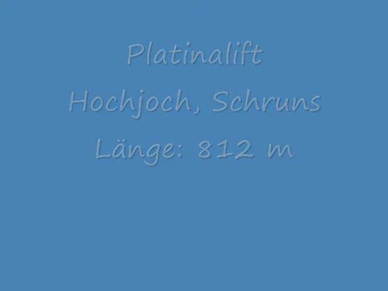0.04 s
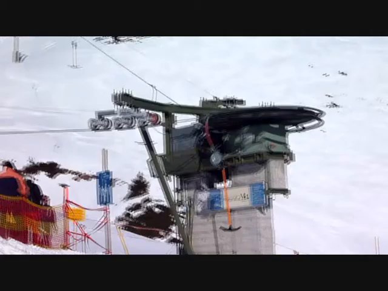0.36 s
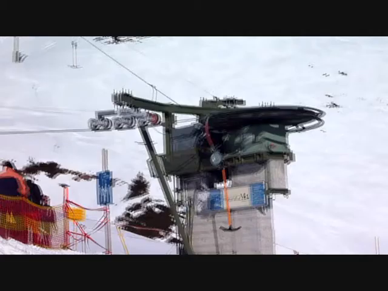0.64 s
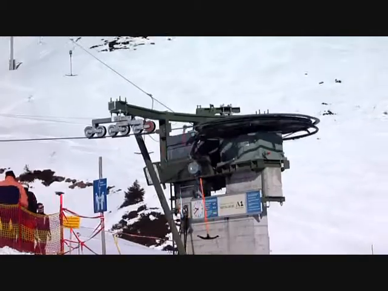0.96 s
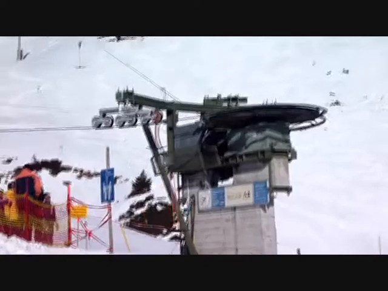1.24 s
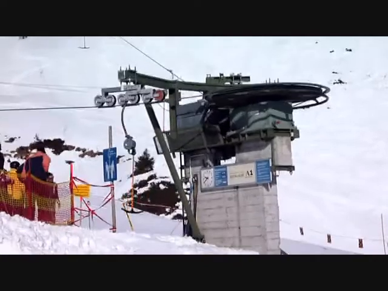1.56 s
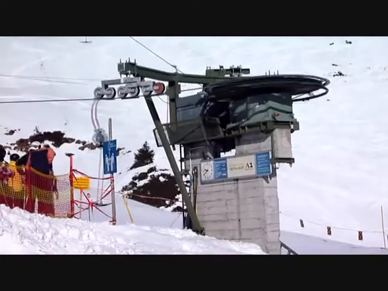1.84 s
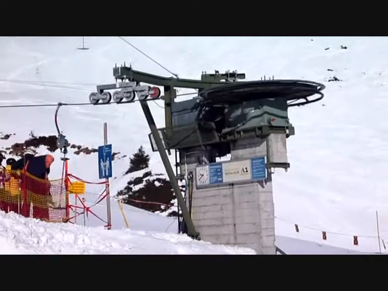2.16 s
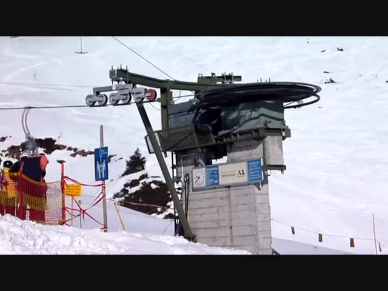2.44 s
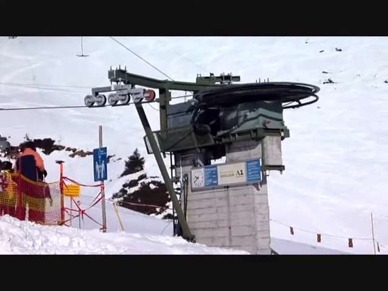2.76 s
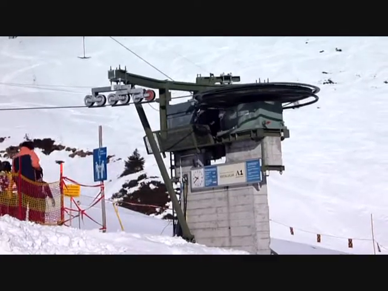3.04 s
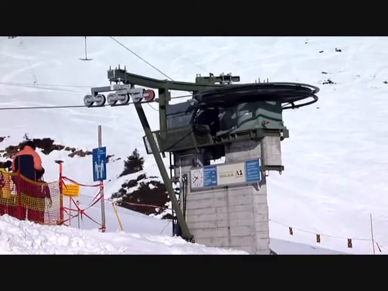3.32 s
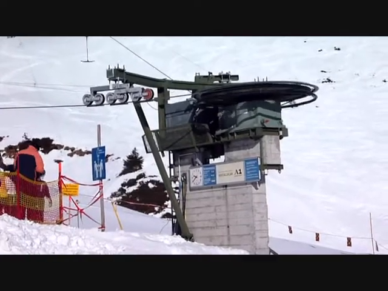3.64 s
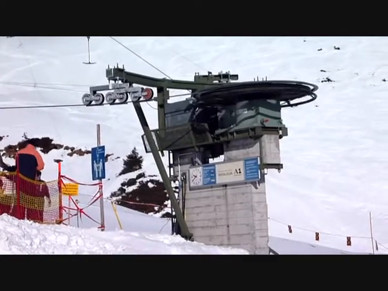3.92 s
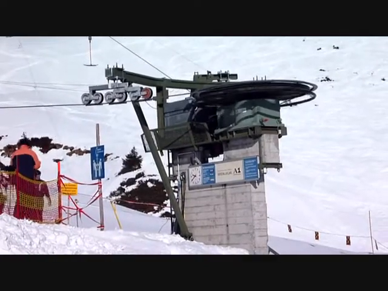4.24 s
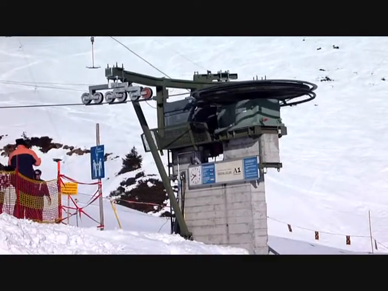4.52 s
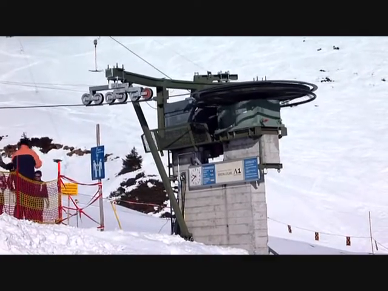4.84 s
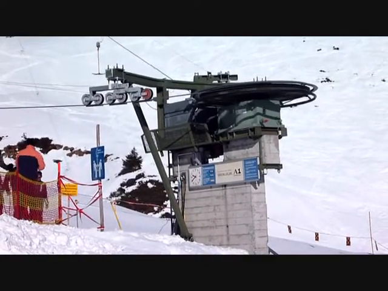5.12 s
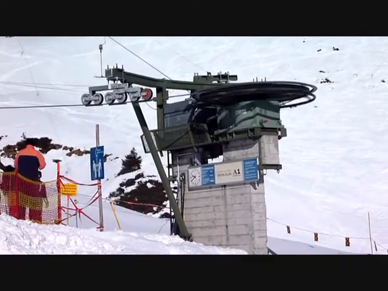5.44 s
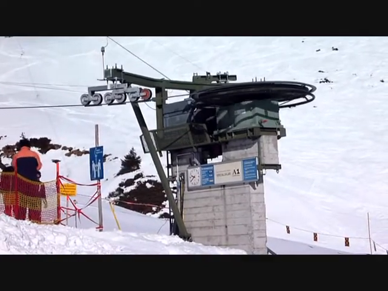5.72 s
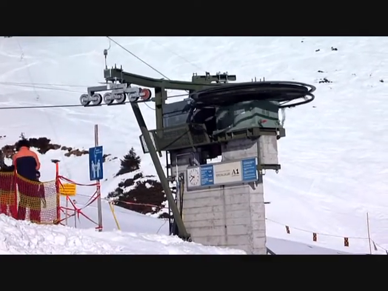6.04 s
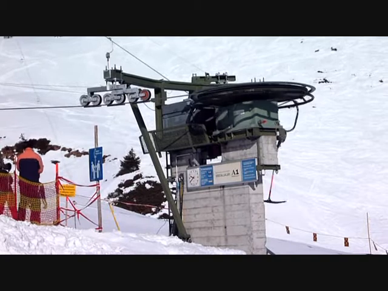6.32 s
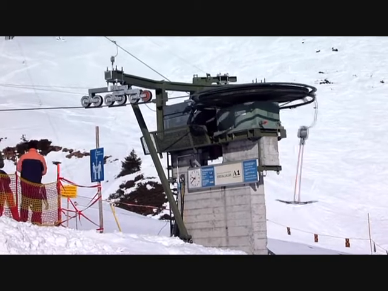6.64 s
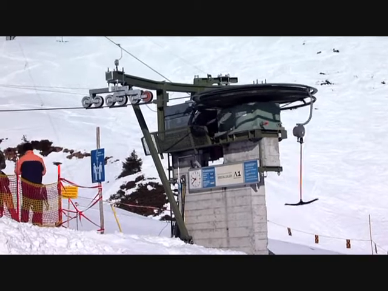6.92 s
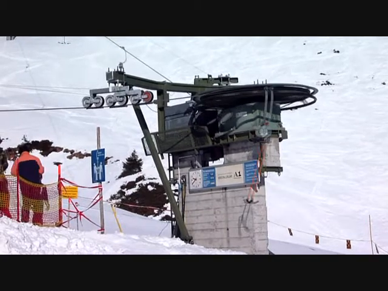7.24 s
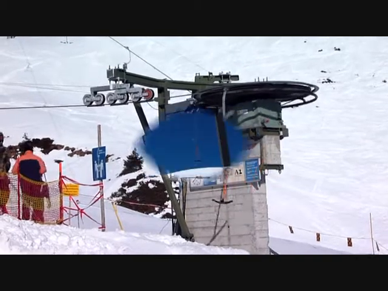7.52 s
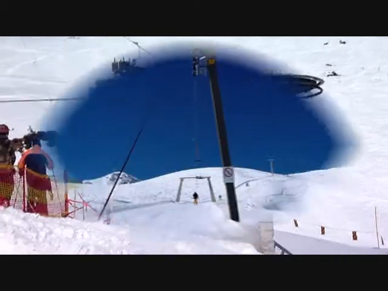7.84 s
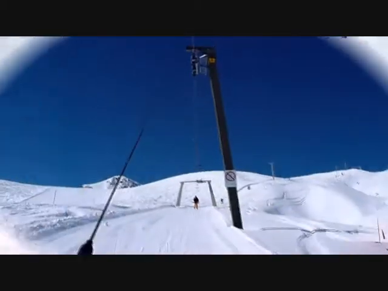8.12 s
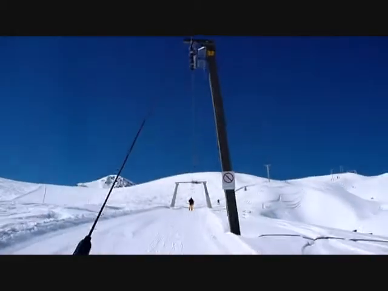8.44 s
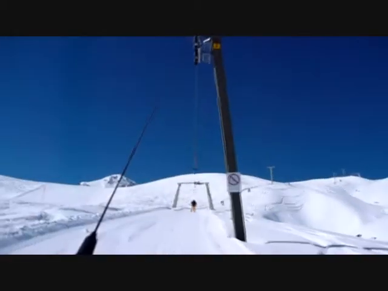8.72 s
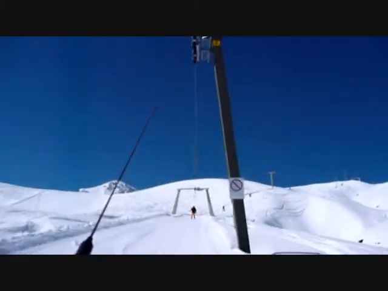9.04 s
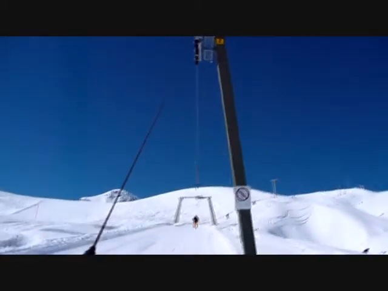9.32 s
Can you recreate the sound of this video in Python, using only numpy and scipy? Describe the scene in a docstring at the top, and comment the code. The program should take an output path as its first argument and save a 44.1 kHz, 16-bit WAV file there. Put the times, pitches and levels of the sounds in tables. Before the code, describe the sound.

A ski lift drive hums and throbs with scraping rope and clanking hangers, then fades into skis sliding on snow and wind.

```python
"""A gearbox hums and throbs after a moment of silence: the drive station of a drag lift on a snowy slope.
Friction of the rope on wheel and rollers excites the steel frame. A sharp snap close by makes the gain
control duck; tow hangers clank through, and the wheel sings as one comes round. The station then fades
into the ride uphill: skis sliding on snow, and wind buffeting the small mono microphone."""
import sys
import numpy as np
from scipy import signal
from scipy.fft import rfft, irfft
from scipy.io import wavfile

SR = 44100
rng = np.random.default_rng(int(sys.argv[2]) if len(sys.argv) > 2 else 0)


def store_pcm(level_fs):
    """Save levels as 16-bit WAV."""
    pcm = np.round(np.clip(level_fs, -1, 1) * 32767).astype(np.int16)
    wavfile.write(sys.argv[1], SR, np.atleast_2d(pcm).T)


N = 413216
TIME, BINS = np.arange(N) / SR, np.fft.rfftfreq(N, 1 / SR)
RIDE_START_S, RIDE_FADE_S = 7.47, 1.42
MIC_EDGE_HZ = 7780


def amp(db):
    """Amplitude ratio of a level in decibels."""
    return 10 ** (np.asarray(db) / 20)


def unit_rms(x):
    """Normalisation to rms 1."""
    return x / np.sqrt(np.mean(x ** 2) + 1e-20)


def envelope(rows, column=1):
    """Gain over time, interpolated in decibels."""
    rows = np.array(rows)
    return amp(np.interp(TIME, rows[:, 0], rows[:, column]))


def swell(s, half_s):
    """Hyperbolic-secant envelope: rises to 1 at time s and dies away."""
    away = np.exp(-abs(TIME - s) / half_s)
    return 2 * away / (1 + away ** 2)


def decay(t, t60):
    """Exponential damping: 60 dB in t60 seconds."""
    return np.exp(-np.log(1000) * t / t60)


def spectrum(points):
    """Gain over frequency, interpolated in decibels on a logarithmic axis."""
    hz, db = np.transpose(points)
    return amp(np.interp(np.log(BINS + 1), np.log(hz + 1), db))


def lowpass(hz, order=6):
    """Butterworth magnitude response."""
    return 1 / np.sqrt(1 + (BINS / hz) ** (2 * order))


def highpass(hz, order=6):
    """Power complement of the low-pass."""
    return np.sqrt(1 - lowpass(hz, order) ** 2)


def resonance(centre_hz, width_hz, hz=BINS):
    """Lorentzian peak of height 1."""
    return 1 / (1 + (2 * (hz - centre_hz) / width_hz) ** 2)


def coloured(x, gain):
    """Filtering by a gain over frequency, to rms 1."""
    return unit_rms(irfft(rfft(x) * gain, len(x)))


def noise(gain, length=N):
    """Filtered Gaussian noise of rms 1."""
    return coloured(rng.standard_normal(length), gain)


def drift(rate_hz):
    """Slow random fluctuation of rms 1, up to about this rate."""
    return noise(lowpass(rate_hz, order=2))


def grit(per_s, spread_db):
    """Shot noise: tiny impacts at random moments, a few of them large."""
    size = amp(spread_db * np.minimum(rng.exponential(1, N), 4))
    return unit_rms(size * rng.choice([-1, 1], N) * (rng.random(N) < per_s / SR))


def tone(cycles, db, waver):
    """Random modulation: a sinusoid wavers in amplitude and phase as the load shifts."""
    angle = 2 * np.pi * (cycles + rng.random())
    knots = np.linspace(0, TIME[-1], 130)
    in_phase, quadrature = (np.interp(TIME, knots, row) for row in rng.standard_normal((2, len(knots))))
    wave = (1 + waver * in_phase) * np.sin(angle) + waver * quadrature * np.cos(angle)
    return amp(db) * unit_rms(wave)


def struck_mode(t, hz, t60):
    """Free vibration of one damped mode, starting at rms 1."""
    return np.sqrt(2) * np.sin(2 * np.pi * (hz * t + rng.random())) * decay(t, t60)


def add(mix, s, sound):
    """Superposition of a sound on the mix at time s."""
    part = mix[round(s * SR):][:len(sound)]
    part += sound[:len(part)]


# harmonics of the motor shaft: (order [1], relative level [dB])
MOTOR_HARMONICS = [(16, -58.5), (18, -51.5), (19, -56), (20, -54), (22, -49.5), (24, -51.5), (26, -48.5),
                   (28, -56.5), (36, -61), (38, -63), (40, -54.7), (42, -66)]
# harmonics of the gear: (order [1], relative level [dB])
GEAR_HARMONICS = [(2, -72), (4, -56), (5, -57.5), (6, -51), (10, -58), (12, -58), (16, -60.5)]
# thin whines of the turning parts: (frequency [Hz], relative level [dB])
WHINE_TONES = [(2740, -61.5), (3052, -61.5), (4581, -66)]
# response of the housing: (frequency [Hz], relative level [dB])
HOUSING_SPECTRUM = [(29, -75), (50, -43), (112, -23), (208, -20.5), (252, -21.5), (276, -18), (326, -14.5),
                    (433, -9), (503, -9), (559, -6), (612, -9), (754, -13.5), (863, -13.5), (1260, -18),
                    (1800, -18.5), (2340, -53.5), (3960, -120)]
# load on the gears, heard in the main mesh tone: (time [s], level [dB])
MESH_LEVEL = [(1.0, -39.5), (1.7, -41), (2.3, -39.5), (2.8, -40.5), (3.4, -39), (4.1, -38.5), (4.85, -44.5),
              (5.7, -40), (6.3, -42.5), (7.0, -38), (7.5, -38.5), (8.45, -40.5)]
# how near the drive sounds: (time [s], gain [dB])
DRIVE_NEARNESS = [(1.2, 0), (2.6, -0.5), (3.9, 1.5), (4.5, -1), (5.05, -2), (5.7, -0.5), (6.3, 0),
                  (6.9, 0.5), (7.6, 0.2)]


def gearbox(motor_hz=24.765, gear_hz=71.19, mesh_order=8, throb_hz=3.175, crest_s=1.463):
    """Periodic forcing: tones share one speed, the mesh tone throbs, tooth noise fills the housing."""
    clock = np.cumsum(1 + 0.00066 * drift(1.3)) / SR  # the speed wanders slightly
    partials = [(k * motor_hz, db) for k, db in MOTOR_HARMONICS]
    partials += [(k * gear_hz, db) for k, db in GEAR_HARMONICS]
    hum = sum(tone(hz * clock, db, waver=0.25) for hz, db in partials)
    whine = sum(tone(hz * clock, db, waver=0.25) for hz, db in WHINE_TONES)
    roar = noise(spectrum(HOUSING_SPECTRUM) * lowpass(999)) * amp(-40.5 + 1.1 * drift(9.9))
    throb = 1 + 0.25 * np.cos(2 * np.pi * throb_hz * (TIME - crest_s))
    mesh = tone(mesh_order * gear_hz * clock, db=0, waver=.12) * throb * envelope(MESH_LEVEL)
    return (hum + whine + roar) * envelope(DRIVE_NEARNESS) + mesh


# resonances of the steel frame and its hangers: (frequency [Hz], bandwidth [Hz], relative level [dB])
FRAME_MODES = [(840, 140, 0), (1370, 80, -6), (1544, 100, -1), (1964, 160, -2.5), (2397, 110, 1.5),
               (2510, 90, 0.5), (2680, 93, -4.5), (3143, 110, 1.5), (3390, 110, 0), (3790, 120, -0.5),
               (4330, 130, -8), (4630, 150, -5)]


def frame_response():
    """Modal summation: the resonances of the steel add in power to a gain over frequency."""
    return np.sqrt(sum(amp(db) ** 2 * resonance(hz, width) for hz, width, db in FRAME_MODES))


# broad colour of the rubbed steel: (frequency [Hz], relative level [dB])
STEEL_SPECTRUM = [(410, -27.5), (700, -12), (751, -6.5), (830, 2.5), (1010, 3), (1270, -3), (1530, -4.5),
                  (1730, -5), (2480, -6), (2880, -6.5), (3250, -7.5), (4130, -13.5), (5810, -17),
                  (6690, -21.5), (7700, -30), (10000, -50), (16900, -120)]
# load of the rope on wheel and rollers: (time [s], relative scrape level [dB], relative hiss level [dB])
ROPE_LOAD = [(1.6, -39.5, -52.5), (2.0, -40, -54), (2.26, -39.5, -45), (2.47, -40, -50.5),
             (2.68, -42, -48.5), (2.91, -40, -46.5), (3.33, -36, -43.5), (3.92, -36, -48.5),
             (4.41, -40, -52), (4.98, -41, -53), (6.75, -39, -47.5), (7.12, -40, -51), (7.4, -39.5, -49.5)]
# a hanger slides along its guide: (time [s], relative level [dB], half length [s])
GUIDE_SWISHES = [(1.03, -52, 0.21), (2.146, -44, 0.064), (4.173, -51, 0.059), (4.686, -48.5, 0.019),
                 (5.042, -50, 0.069), (5.511, -48.5, 0.12)]


def rope(knock_t60=.09, ripple_db=1.1):
    """Friction noise: rope and liners rub in a dense grit that rings the frame, under a finer hiss."""
    rub = rng.standard_normal(N) + 0.42 * grit(1200, spread_db=4.0)
    load = envelope(ROPE_LOAD)
    # small knocks, each a dying rattle, stand out more the harder the rope rubs
    impacts = abs(grit(30, spread_db=1.2))
    knocks = unit_rms(signal.lfilter([1], [1, -decay(1 / SR, knock_t60)], impacts))
    rattle = 0.5 * np.tanh(unit_rms(load)) * knocks * rng.standard_normal(N)
    # countless weak modes of the structure ripple the colour
    mode_hz = np.arange(0, 9000, 22)
    ripple = amp(ripple_db * np.interp(BINS, mode_hz, rng.standard_normal(len(mode_hz))))
    steel = spectrum(STEEL_SPECTRUM) * ripple * (1 + 0.79 * frame_response())
    scrape = coloured(rub + rattle, steel * highpass(1026) * lowpass(5050)) * amp(-1 + 0.29 * drift(12))
    hiss = coloured(rub, steel * highpass(4830)) * amp(0.26 + 0.93 * drift(15))
    swish = sum(amp(db) * swell(s, half_s) for s, db, half_s in GUIDE_SWISHES)
    return scrape * np.hypot(load, swish) + hiss * np.hypot(envelope(ROPE_LOAD, column=2), swish)


# tones of the snap: its ringing, and a low overload tone that colours it:
# (frequency [Hz], relative level [dB], t60 [s])
SNAP_TONES = [(1350, -16.5, .007), (1895, -7, 0.0077), (2580, -13.5, 0.016), (4240, -1.5, 0.0096),
              (4990, -1.5, 0.0092), (5803, 6.5, 0.0068), (7700, -14, 0.013)]


def snap(s=1.2083, gain_db=2.3, rise_s=0.00017):
    """Damped oscillation: a small hard part snaps by the microphone; its tones die in milliseconds."""
    out, t = np.zeros(N), np.arange(SR // 20) / SR
    tones = sum(amp(db) * decay(t, t60) * np.sin(2 * np.pi * hz * t) for hz, db, t60 in SNAP_TONES)
    add(out, s, amp(gain_db) * tones * (1 - np.exp(-t / rise_s)))
    return out


# colour of the rumbles: (frequency [Hz], relative level [dB])
RUMBLE_SPECTRUM = [(40, -17.5), (100, -8.5), (200, -3), (300, -3.5), (450, -4.5), (800, -22), (2000, -56)]
# low rumbles: a faint one just after the snap, then gusts at the microphone:
# (time [s], relative level [dB], half length [s])
RUMBLES = [(1.3, -55, .08), (4.245, -43.5, 0.029), (4.548, -40.5, 0.02), (4.67, -48.5, 0.067),
           (4.963, -48.5, 0.044), (8.515, -42.5, 0.04), (8.916, -47, 0.028), (9.132, -49, 0.025),
           (9.222, -44, 0.021), (9.315, -48, 0.034)]
# pressure pops of the wind: (time [s], swing level [dB], half period [s], push level [dB])
WIND_POPS = [(4.244, -26, 0.001, -34), (4.316, -34.5, 0.0018, -34), (8.5088, -24, 0.0012, -15),
             (8.706, -38.5, 0.0016, -27.5), (8.747, -35, 0.0008, -30), (8.895, -40, 0.0018, -32),
             (8.941, -36, 0.0015, -28), (9.103, -33, 0.0018, -22), (9.2047, -29.5, 0.0015, -16.5),
             (9.208, -34, 0.002, -28), (9.22, -32, 0.0013, -29)]


def rumbles_and_wind(push_lag_s=0.023, push_width_s=.015):
    """Pressure fluctuation: lumpy rumbles; a wind pop is one sharp swing, then a push too low to hear."""
    swells = sum(amp(db) * swell(s, half_s) for s, db, half_s in RUMBLES)
    out = noise(spectrum(RUMBLE_SPECTRUM)) * swells * amp(-1 + 2 * drift(30))
    for s, db, half_s, push_db in WIND_POPS:
        swing = np.sin(np.pi * np.arange(0, 2 * half_s, 1 / SR) / half_s)
        add(out, s, amp(db) * swing)
        out += amp(push_db) * np.exp(-((TIME - s - push_lag_s) / push_width_s) ** 2 / 2)
    return out


def rebounds(t, t60, gap_s=.008, restitution=.66, count=3):
    """Inelastic collision: the envelope of a loose part that strikes again, each time more weakly."""
    gaps = gap_s * rng.uniform(.7, 1.3, count - 1)
    delays = np.append(0, np.cumsum(gaps))
    energies = restitution ** (2 * np.arange(count))
    power = sum(energy * (t >= s) * decay(abs(t - s), t60) ** 2 for s, energy in zip(delays, energies))
    return np.sqrt(power / energies.sum())


# modes of a hanger's tube: (frequency [Hz], relative level [dB])
TUBE_MODES = [(1513, -3.5), (1890, 0), (2245, 2.5), (2503, -3), (2700, 0), (2815, -0.5), (3090, 0.5),
              (3350, -1), (3962, -7.5), (4253, -9), (4800, -10.5)]
# hangers knock through the rollers: (time [s], relative level [dB], rattle t60 [s], tilt [dB/octave],
# ring frequency [Hz], relative ring level [dB], ring t60 [s])
HANGER_KNOCKS = [(1.571, -37.5, 0.22, -1, 3340, -43, .3), (1.729, -33.5, 0.13, -4, 3170, -43, .2),
                 (2.073, -36, 0.33, -8, 827, -41, .3), (2.107, -35.5, 0.14, -6, 1950, -47, .1),
                 (3.115, -37, .45, -6, 2400, -52, .2), (3.249, -45, 0.17, -3, 2440, -40.5, .35),
                 (3.525, -40, .15, -6, 1570, -45, .2), (3.596, -41, 0.11, -8, 1484, -40, .15),
                 (3.615, -32.5, 0.27, -5, 1974, -39.5, 0.45), (3.657, -33, 0.08, 4, 2390, -41, 0.34),
                 (3.73, -31.5, .08, -2.5, 1780, -41, .15), (3.742, -30.5, 0.084, -1, 3375, -36.5, .25),
                 (3.842, -39.5, .1, -5, 2460, -39, .2), (3.951, -36.5, 0.08, -6, 2540, -43, 0.23),
                 (4.206, -33, 0.11, -5.5, 1980, -46, .15), (4.235, -36, .08, -5.5, 2550, -36, 0.16),
                 (4.456, -30.5, 0.1, -4, 3270, -39, 0.18), (4.562, -33.5, 0.18, -6.5, 3380, -47.5, .7),
                 (4.67, -30, 0.1, -5.5, 1545, -39.5, 0.17), (6.503, -33.5, 0.14, -1, 2700, -39.5, .3),
                 (6.516, -32, 0.29, -4.5, 1520, -44, 0.45), (6.545, -42, 0.82, -8.5, 1044, -48, 0.5)]


def hangers(rise_s=.0008, tube_db=-9, split_hz=28):
    """Impact excitation: each knock rattles frame and tube; where it strikes picks one strong ring."""
    out, t = np.zeros(N), np.arange(SR // 2) / SR
    hz = np.fft.rfftfreq(len(t), 1 / SR)
    body = np.interp(hz, BINS, frame_response() * highpass(450, order=3) * lowpass(MIC_EDGE_HZ))
    tube_hz, mode_db = np.transpose(TUBE_MODES)
    for s, db, t60, tilt, ring_hz, ring_db, ring_t60 in HANGER_KNOCKS:
        rattle = noise(body * amp(tilt * np.log2(hz + 1)), len(t)) * rebounds(t, t60)
        shares = amp(mode_db + tilt * np.log2(tube_hz))
        shares /= np.linalg.norm(shares)
        tube = sum(share * struck_mode(t, f, 2 * t60) for f, share in zip(tube_hz, shares))
        # three close modes beat
        ring = sum(struck_mode(t, ring_hz + k * split_hz, ring_t60) for k in (-1, 0, 1)) / np.sqrt(3)
        knock = amp(db + 0.9) * (rattle + amp(tube_db) * tube) + amp(ring_db + 1) * ring
        add(out, s, knock * (1 - np.exp(-t / rise_s)))
    return out


# small hard parts of a hanger tick: (time [s], level [dB], centre [Hz], bandwidth [Hz], t60 [s])
HANGER_TICKS = [(1.573, -36.5, 3350, 500, .06), (1.745, -36, 3300, 700, .05),
                (2.114, -35, 3900, 3000, 0.044), (2.146, -29.5, 5240, 3200, 0.029),
                (2.184, -28.5, 4000, 3000, .02), (2.198, -37, 5200, 1800, .025),
                (2.208, -30.5, 6200, 1300, 0.04), (3.3663, -24, 2450, 1200, .02),
                (3.931, -35, 4380, 250, 0.055), (3.951, -30, 2900, 2400, .025),
                (4.671, -37, 5000, 900, .04), (6.287, -28, 4250, 1700, .028),
                (6.299, -29, 2750, 1200, .035), (6.3, -39, 4600, 1200, .07), (6.503, -30, 2700, 3400, .04),
                (6.503, -39, 4850, 800, 0.055), (6.518, -39, 4680, 700, .15)]


def ticks(rise_s=.0004):
    """Modal overlap: closely packed modes merge into a short, bright burst of noise in one band."""
    out, t = np.zeros(N), np.arange(SR // 5) / SR
    hz = np.fft.rfftfreq(len(t), 1 / SR)
    for s, db, centre_hz, width_hz, t60 in HANGER_TICKS:
        burst = noise(resonance(centre_hz, width_hz, hz), len(t))
        add(out, s, amp(db) * burst * decay(t, t60) * (1 - np.exp(-t / rise_s)))
    return out


# partials of the wheel's note: (order [1], relative level [dB])
WHEEL_HARMONICS = [(2, -55.5), (3, -58), (4, -68)]
# the wheel sings out as a hanger rounds it: (time [s], gain [dB])
WHEEL_SWELL = [(5.2, -24.5), (5.6, -3), (6.1, 3), (7.7, -1.5)]


def wheel(fundamental_hz=1323, flat_share=.028, flat_at_s=5.5, settle_s=.38, rim_hz=2650):
    """Resonance: rope and wheel sing a thin note that slides up and settles, over the rim's fuzzy ring."""
    flatness = flat_share * np.exp(np.minimum((flat_at_s - TIME) / settle_s, 1))
    pitch = fundamental_hz * (1 - flatness) * (1 + .0008 * drift(6))
    cycles = np.cumsum(pitch) / SR
    note = sum(tone(k * cycles, db, waver=0.52) for k, db in WHEEL_HARMONICS)
    rim = noise(resonance(rim_hz, width_hz=150)) * amp(-56 + 2 * drift(8))
    return (note + rim) * envelope(WHEEL_SWELL)


# snow under the skis: (frequency [Hz], relative level [dB])
SNOW_SPECTRUM = [(120, -26.5), (200, -6), (357, -6), (470, -9.5), (557, -6), (815, -4), (867, -3.5),
                 (1500, -7.5), (1700, -6.5), (2810, -12), (3980, -11.5), (4300, -16.5), (6220, -18),
                 (7700, -29.5), (10000, -70), (16900, -120)]
# how hard the ski edges scrape: (time [s], level [dB])
EDGE_BITE = [(8.6, -55), (8.68, -50), (8.72, -53), (8.82, -48), (8.91, -63), (9.0, -46), (9.07, -47.5),
             (9.13, -57.5), (9.24, -54), (9.36, -53)]


def skis(edge_hz=1680):
    """Sliding friction: snow crystals crush under the skis; the edges scrape as they bite."""
    crush = rng.standard_normal(N) + 0.71 * grit(900, spread_db=2.0)
    bite = envelope(EDGE_BITE)
    mean_bite = bite[TIME > RIDE_START_S + RIDE_FADE_S / 2].mean()
    slide = coloured(crush, spectrum(SNOW_SPECTRUM)) * amp(-44 + 0.9 * drift(6.3))
    slide *= (bite / mean_bite) ** 0.14  # swells slightly with the bite
    coarse_crush = rng.standard_normal(N) + 0.71 * grit(900, spread_db=6.5)
    scrape = coloured(coarse_crush, resonance(edge_hz, width_hz=650))
    return slide + scrape * bite


# the station gives way to the ride: (time [s], gain [dB])
STATION_FADE = [(7.45, -0.5), (8.0, -3.5), (8.3, -8), (8.5, -9.5), (8.62, -20.5), (8.9, -39)]


def scene():
    """Superposition at one microphone: the station fades out as the ride fades in."""
    ride_fade = np.clip((TIME - RIDE_START_S) / RIDE_FADE_S, 0, 1)
    station = gearbox() + rope() + wheel() + hangers() + ticks()
    mono = envelope(STATION_FADE) * station + ride_fade * skis() + rumbles_and_wind() + snap()
    return np.array([mono, mono])


def gain_control(x, threshold_db=-21, slope=0.69, recover_db_per_s=36):
    """Compression: the gain falls within milliseconds of a loud sound and recovers steadily."""
    power = signal.lfilter([1], [1, -np.exp(-1 / 220)], x ** 2) / 220  # 5 ms average
    cut_db = np.maximum(10 * np.log10(power + 1e-12) - threshold_db, 0) * slope
    recovery = TIME * recover_db_per_s
    held_db = np.maximum.accumulate(cut_db + recovery) - recovery
    return amp(-signal.lfilter(np.ones(100) / 100, 1, held_db))


def record(dry, start_s=.903, notch_hz=2885, notch_width_hz=90, band_limit_hz=15600):
    """Band limiting and overload: a dull, notched microphone, gain control and asymmetric clipping."""
    notch = abs(BINS - notch_hz) / np.hypot(BINS - notch_hz, notch_width_hz / 2)
    mic = highpass(66, order=4) * notch * lowpass(MIC_EDGE_HZ, order=70)
    # silence until the sound cuts in
    gate = np.interp(TIME, [start_s, start_s + .003, TIME[-1] - .003, TIME[-1]], [0, 1, 1, 0])
    ducked = irfft(rfft(dry[0]) * mic, N) * gain_control(dry[0]) * gate
    clipped = np.clip(ducked, -0.34, 0.43)
    softened = irfft(rfft(clipped) * lowpass(11000, order=3), N)
    band_limit = signal.firwin(511, band_limit_hz, window=("kaiser", 9), fs=SR)
    mono = signal.oaconvolve(softened, band_limit, "same")
    return np.array([mono, mono])


dry = scene()
out = record(dry)
store_pcm(out)
```